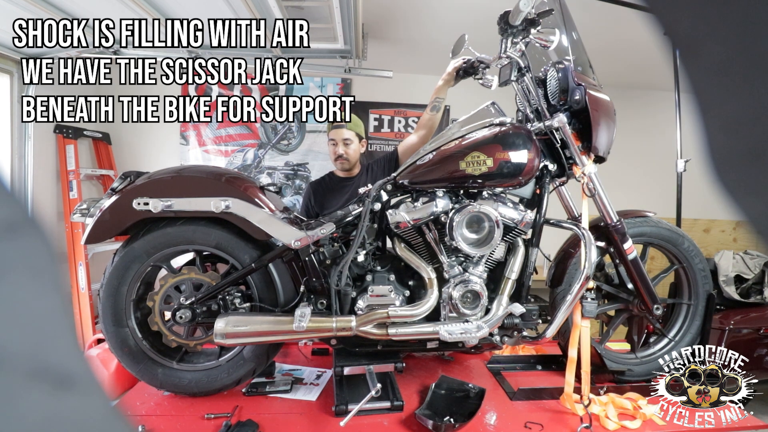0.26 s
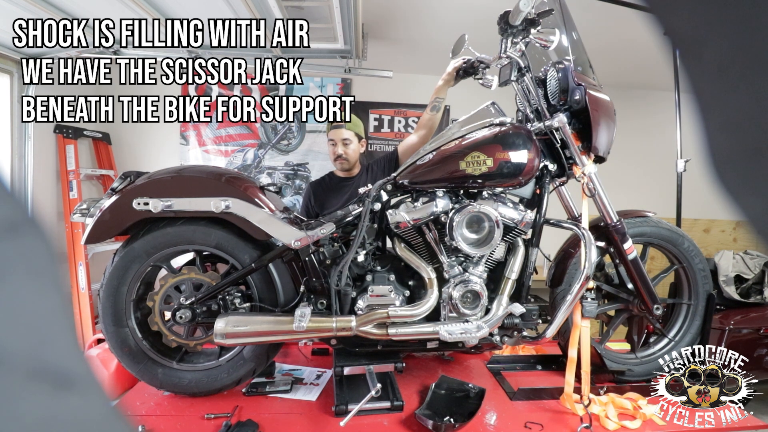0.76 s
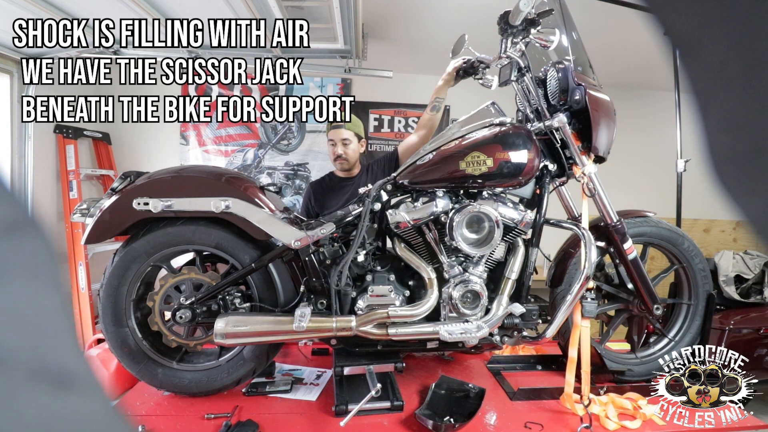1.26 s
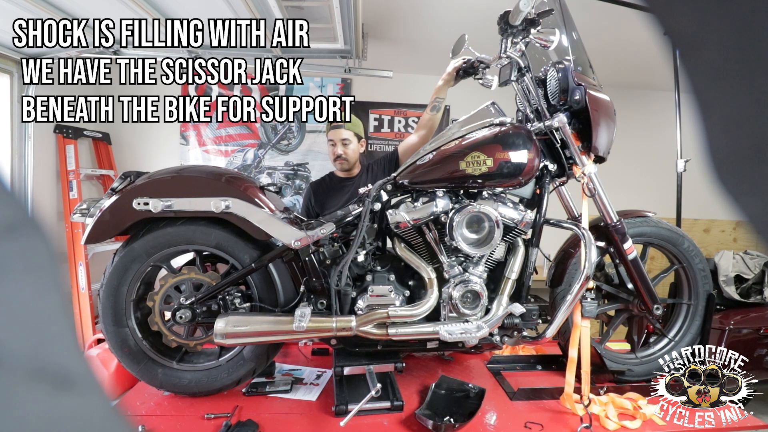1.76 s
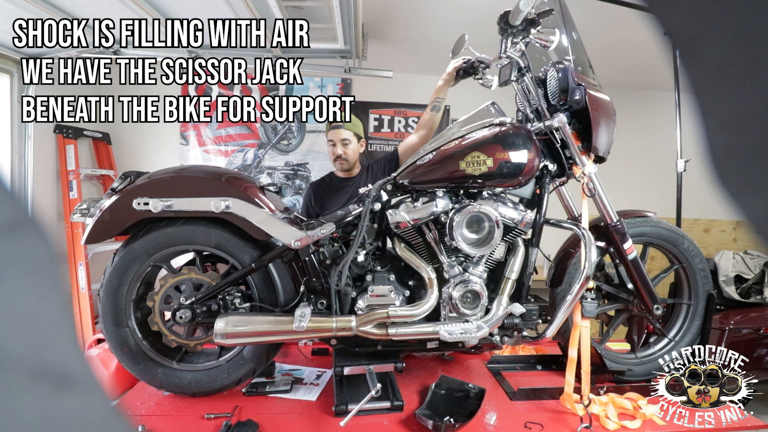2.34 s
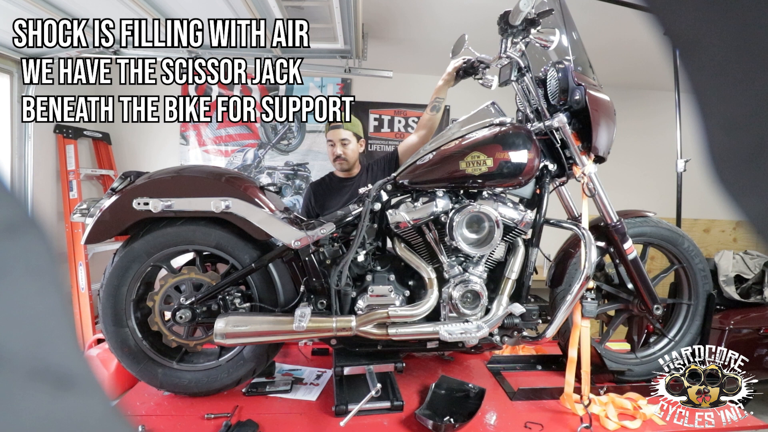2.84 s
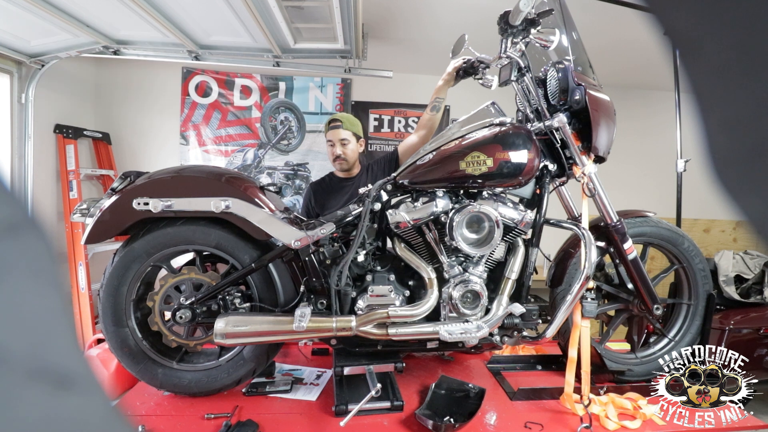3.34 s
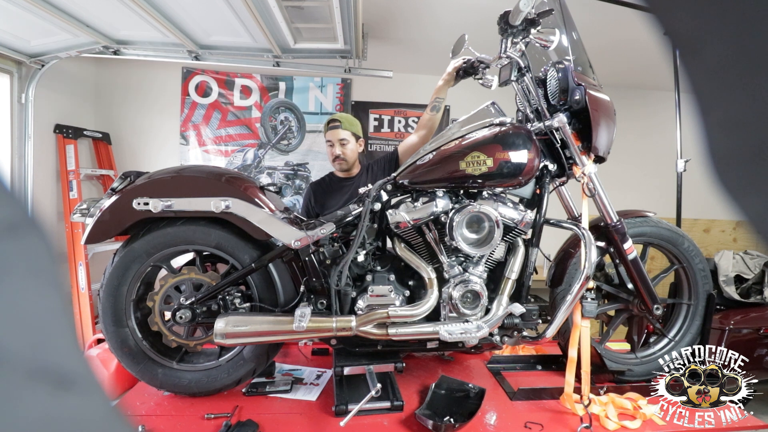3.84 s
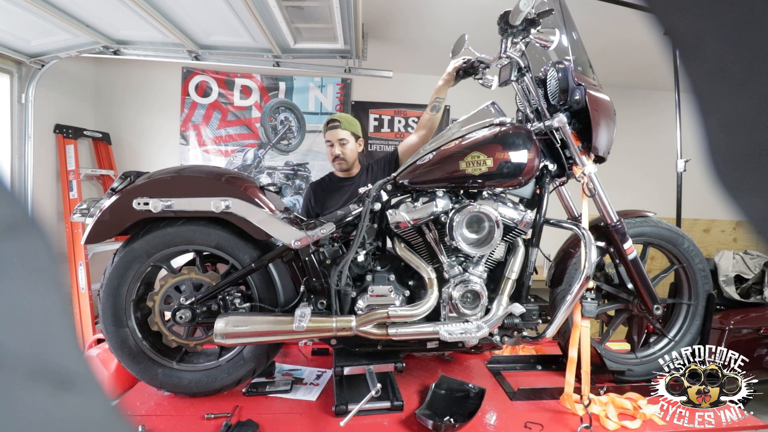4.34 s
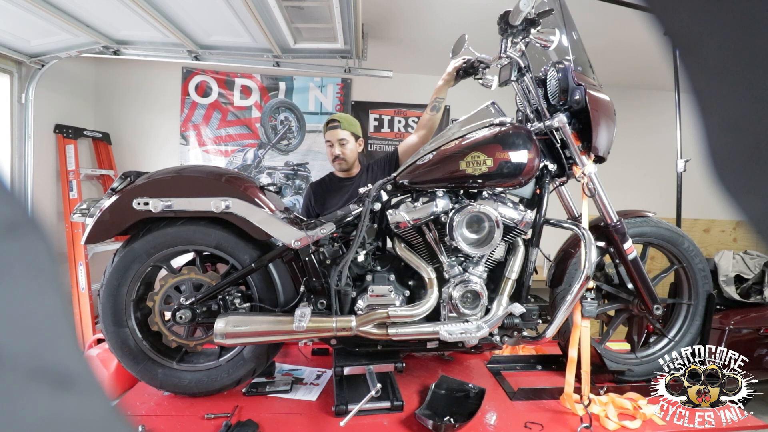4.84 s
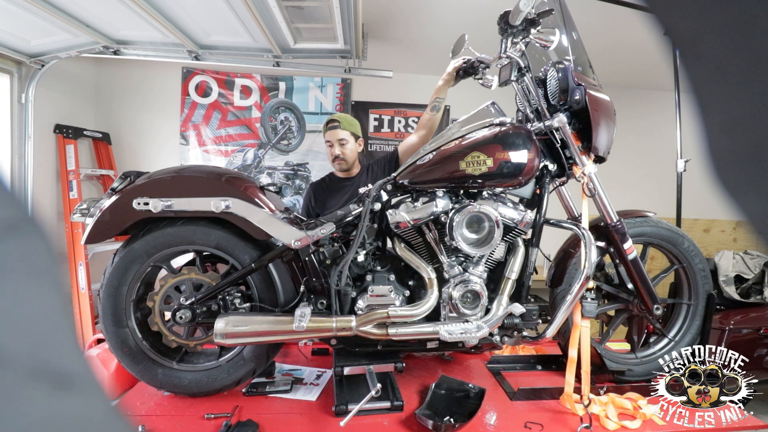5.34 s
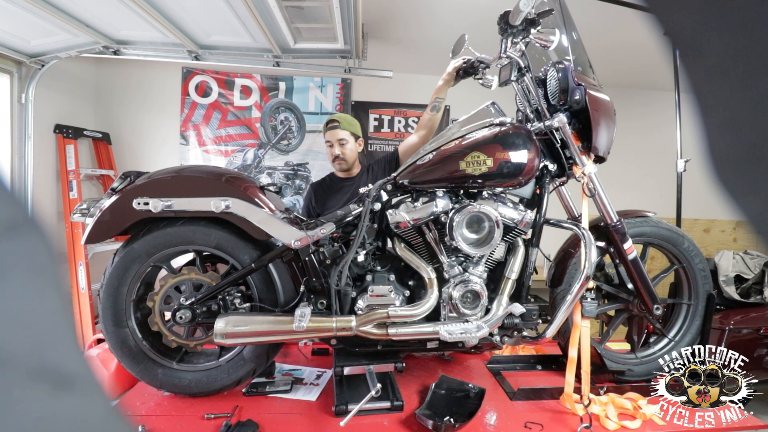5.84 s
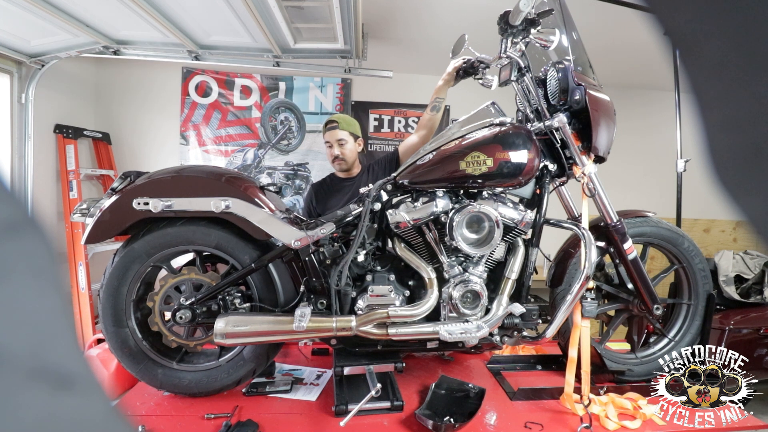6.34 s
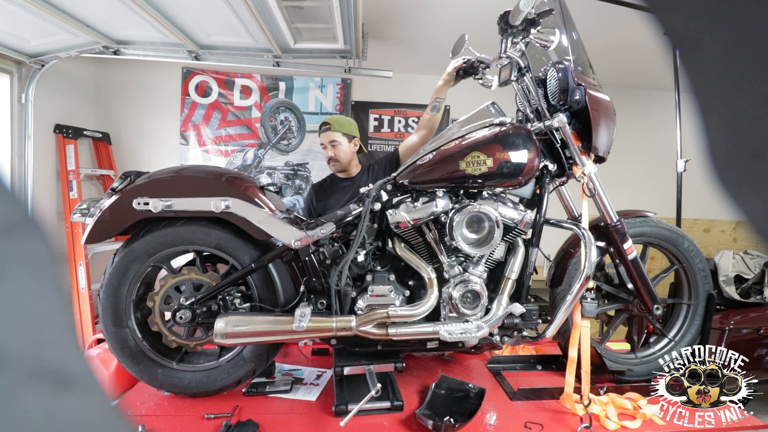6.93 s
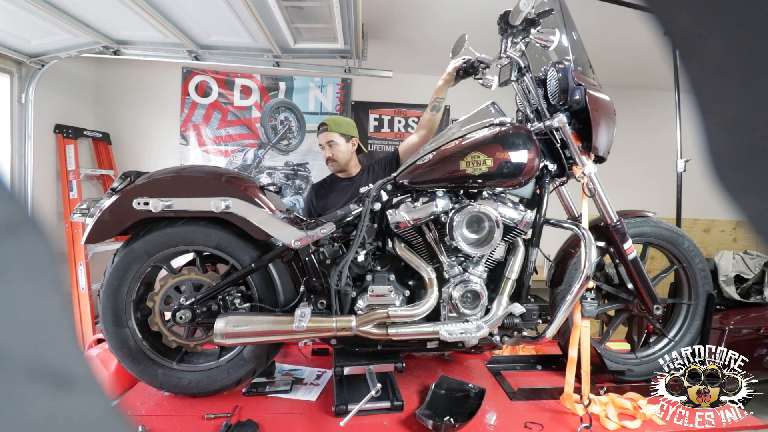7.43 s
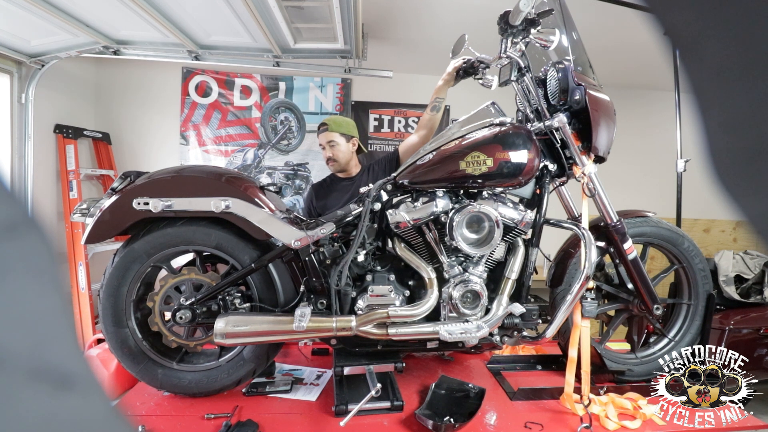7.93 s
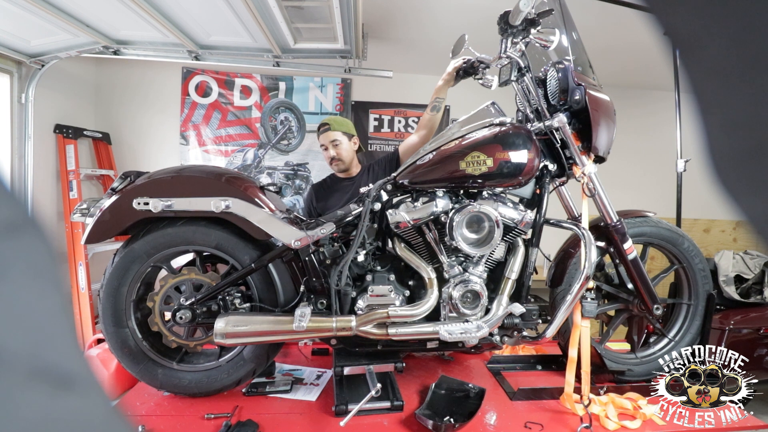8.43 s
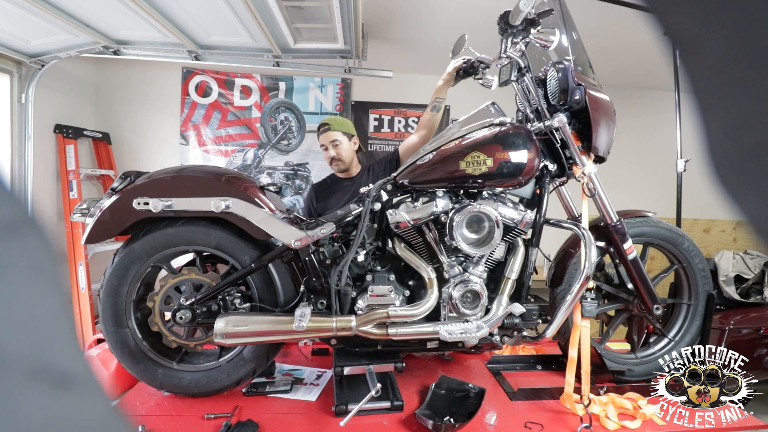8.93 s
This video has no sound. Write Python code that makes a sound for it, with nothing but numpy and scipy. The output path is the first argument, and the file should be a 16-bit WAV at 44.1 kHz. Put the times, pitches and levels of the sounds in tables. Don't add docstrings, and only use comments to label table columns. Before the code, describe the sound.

A small piston compressor is already running in a garage, a harsh, fast metallic clatter fused into a buzzing drone. Its pitch sinks slightly, quickest in the first second, as air hiss fades. A dull thud bounces early, a bright metal tick comes before the middle, and a loose panel buzzes in spells. Fairly close microphone, short room reverberation, no silence.

```python
import sys
import numpy as np
from scipy import signal
from scipy.fft import rfft, irfft, next_fast_len
from scipy.io import wavfile
from scipy.ndimage import uniform_filter1d

SR = 44100
rng = np.random.default_rng(int(sys.argv[2]) if len(sys.argv) > 2 else 0)


def boost_factor(decibels):
    exponent = np.asarray(decibels, float) / 20
    return 10 ** exponent


def persist_wave(psi):
    counts = np.round(np.clip(psi, -1, 1) * 32767).astype(np.int16)
    wavfile.write(sys.argv[1], SR, np.atleast_2d(counts).T)


N = 404397
TIME = np.arange(N) / SR
CAGE = .421

# crank angle in turns, level in dB.
STROKE_KNOCKS = [(.82, -5.5), (.87, -2), (0.932, -5.5), (.99, -1.5), (.05, -2.5), (.1, -1.5), (.18, -1),
                 (.26, -2), (0.358, -6.5), (0.477, -5), (.6, -3.5), (0.697, -2.5)]


def unit(x):
    return x / np.sqrt(np.mean(x ** 2))


def colour(x, table):
    size = next_fast_len(len(x))
    hz, db = np.transpose(table)
    f = np.maximum(np.arange(size // 2 + 1) * SR / size, 1)
    gain = boost_factor(np.interp(np.log(f), np.log(hz), db, -90, -90))
    return irfft(rfft(x, size) * gain, size)[:len(x)]


def ring(x, hz, width):
    return signal.lfilter(*signal.iirpeak(hz, hz / width, SR), x)


def walk(rate):
    k = int(SR / rate)
    held = np.repeat(rng.standard_normal(N // k + 1), k)
    return 1.53 * uniform_filter1d(uniform_filter1d(held, k), k)[:N]


def swell(start, length):
    rise_s = 0.36
    return np.clip(np.minimum(TIME - start, start + length - TIME) / rise_s + .5, 0, 1)


def blows(turns, slack, table, sway, jitter, scatter_db):
    angle, db = np.transpose(table)
    count = int(turns[-1])
    at = np.arange(count)[:, None] + angle
    chance = rng.standard_normal((count, 2, len(angle)))
    loose = np.interp(at, turns, slack)
    lean = rng.uniform(0, 2 * np.pi, len(angle))
    at = at + loose * (sway * np.cos(2 * np.pi * CAGE * at + lean) + jitter * chance[:, 0])
    size = rng.choice([-1, 1], len(angle)) * boost_factor(db + scatter_db * chance[:, 1])
    out = np.zeros(N)
    np.add.at(out, np.interp(at, turns, np.arange(N)).astype(int), size)
    return unit(out)


def hiss(turns, spread_db, start, rise, fall, floor):
    angle = (turns - start) % 1
    effort = floor + (1 - np.exp(-angle / rise)) * np.exp(-angle / fall)
    grit = boost_factor(spread_db * np.minimum(rng.exponential(size=N), 5))
    return unit(effort * rng.standard_normal(N) * grit)


def beat(turns, slack, depth_db):
    cage = np.cos(2 * np.pi * CAGE * turns) + 0.09 * np.cos(2 * np.pi * (1 - CAGE) * turns)
    return boost_factor(depth_db * slack * cage)


def housing(turns, slack, treble_db):
    # frequency in Hz, level in dB per Hz.
    cast_spectrum = [(800, -13), (1250, -10.5), (1480, -1), (1900, -1.5), (2400, -5.5), (2600, -8.5),
                     (3050, -6), (3400, -4), (3900, -9.5), (4400, -10), (7200, -22), (10500, -28.5),
                     (13300, -37.5), (16500, -43)]
    # frequency in Hz, width in Hz, level in dB above the body.
    cast_modes = [(1610, 36, -5), (1778, 82, -3.5), (2114, 8.2, 12), (2323, 18, 9), (2424, 21, 8),
                  (2703, 280, -7.5), (3240, 36, 3.5), (3424, 260, -1.5), (4192, 73, 2.5), (5300, 114, -1.5),
                  (5554, 84, 0), (6620, 173, 4), (8084, 100, 10.5), (8920, 150, -0.5), (10040, 230, 2),
                  (12050, 220, 6.5), (12700, 74, -2)]
    drive = blows(turns, slack, STROKE_KNOCKS, .015, .008, .8)
    drive = drive + boost_factor(-4) * hiss(turns, 1.2, .82, .06, .3, .16)
    body = colour(drive * beat(turns, slack, 0.51), cast_spectrum)
    whole = body + sum(boost_factor(db + .5 * walk(.5)) * ring(body, hz, w) for hz, w, db in cast_modes)
    whole = whole - .85 * ring(whole, 3735, 240)
    treble = colour(whole, [(6000, -30), (10000, 0), (17000, 0)])
    middle = np.std(colour(whole, [(1500, 0), (2600, 0)]))
    panel_ring = boost_factor(-15) * unit(ring(body, 1447, 20))
    return (whole + (boost_factor(treble_db) - 1) * treble) / middle + panel_ring


def frame(turns, slack):
    # frequency in Hz, level in dB per Hz.
    frame_spectrum = [(20, -24), (50, -16), (100, -6), (150, -9.5), (400, -10), (520, 0), (800, -8.5),
                      (930, -4), (1100, -6.5), (1300, -1), (1600, -30)]
    knock = blows(turns, slack, STROKE_KNOCKS, .025, .009, .8)
    knock = colour(knock, [(400, -30), (700, 0), (3000, 0)])
    drive = 2 * knock + hiss(turns, 2.5, 1.0, 0.17, 0.82, 0.89)
    body = colour(drive * beat(turns, slack, 0.29), frame_spectrum)
    return unit(body + boost_factor(1) * ring(body, 1020, 157))


def reed(turns, slack):
    # crank angle in turns, level in dB.
    reed_slaps = [
        (.94, 0),
        (.995, -13),
    ]
    # frequency in Hz, width in Hz, level in dB.
    reed_modes = [(3665, 58, 0), (3795, 55, -1)]
    drive = blows(turns, slack, reed_slaps, .006, .0025, .7)
    drive = drive + boost_factor(-21) * hiss(turns, 1.5, .95, .1, .1, .05)
    drive = drive * beat(turns, slack, .9)
    pair = sum((-1) ** k * boost_factor(db) * ring(drive, hz, w) for k, (hz, w, db) in enumerate(reed_modes))
    return unit(ring(pair, 3730, 270))


def head(turns, slack):
    head_hz, width_hz = 1650, 350
    drive = blows(turns, slack, [(.97, 0)], .012, .008, 1.2) * beat(turns, slack, 1)
    return unit(ring(ring(drive, head_hz, width_hz), head_hz, 2 * width_hz))


def cover(cast):
    return boost_factor(-24.5) * np.exp(-TIME / 0.36) * unit(ring(cast, 2305, 250))


def thump(turns, speed_hz, slack, settled):
    # multiple of the shaft, level in dB, change in dB once the loose part settles.
    shaft_tones = [(1, -47.5, -1), (2, -35.5, -4), (3, -55, 0), (4, -38, -2), (5, -40, 2), (6, -40.5, -10),
                   (7, -40.5, -11), (8, -47.5, -22), (9, -31.5, -2), (10, -52.5, 0), (11, -52, 10.5),
                   (12, -51, 6), (13, -37.5, -0.5), (14, -41, 5), (15, -29, -15), (16, -43.5, 8),
                   (17, -44, 2), (18, -45.5, 3)]
    # frequency in Hz, width in Hz, lift in dB.
    path_lifts = [(126.7, 1.6, -9), (194.3, 3.5, 10), (256.3, 1.6, -22), (325, 2, 4), (333.3, 2, -10),
                  (385, 1.3, -11), (453, 1.7, -13), (527, 4, 9), (577.5, 3.8, -13), (650, 11, 15),
                  (696, 4, 11), (772, 17, 14), (856, 10, -18), (910, 8, 15), (950, 12, -14), (1038, 5, 15)]
    coarse = slice(None, None, 256)
    out = np.zeros(N)
    for k, db, settled_db in shaft_tones:
        path_db = sum(lift / (1 + ((k * speed_hz[coarse] - hz) / w) ** 2) for hz, w, lift in path_lifts)
        path_db = np.interp(TIME, TIME[coarse], path_db)
        gain = boost_factor(db + path_db + settled_db * settled + 0.44 * walk(2.63))
        phase = rng.uniform(0, 2 * np.pi, 2)
        tone = np.sin(2 * np.pi * k * turns + phase[0])
        side = slack * boost_factor(-11 + 2 * walk(.8)) * np.sin(2 * np.pi * (k - CAGE) * turns + phase[1])
        out = out + gain * (tone + side * (k > 2))
    return out


def sing(turns, seating):
    return boost_factor(-25.5) * seating * np.sin(2 * np.pi * 34 * turns)


def rush():
    # frequency in Hz, level in dB per Hz.
    air_spectrum = [(7000, -20), (9000, 0), (13000, -3), (15500, -12)]
    return boost_factor(-45) * np.exp(-TIME / .6) * unit(colour(rng.standard_normal(N), air_spectrum))


def engine():
    # time in seconds, pitch in Hz, level in dB.
    engine_revs = [(0, 80, -52), (1.85, 79, -50), (2.3, 78, -53), (3.3, 85, -54), (3.45, 94, -46),
                   (3.8, 99, -47), (4.12, 117, -51), (4.8, 103, -47), (5.5, 99, -54), (7.1, 99, -60),
                   (9.17, 80, -57)]
    s, hz, db = np.transpose(engine_revs)
    turns = np.cumsum(np.interp(TIME, s, hz) * (1 + 0.0078 * walk(14))) / SR
    return np.sqrt(2) * boost_factor(np.interp(TIME, s, db) + 2 * walk(6)) * np.sin(2 * np.pi * turns)


def panel():
    # start in seconds, length in seconds, level in dB.
    buzz_spells = [
        (0.307, 0.41, -30),
        (.85, 0.63, -29.5),
        (2.0, 0.45, -38),
        (3.0, 0.61, -29.5),
        (3.702, 0.79, -33),
        (8.003, .2, -39.5),
        (8.853, .4, -31),
    ]
    buzz = boost_factor(-49.5) + sum(boost_factor(db) * swell(s, length) for s, length, db in buzz_spells)
    turns = np.cumsum(1447 + 3 * walk(25)) / SR
    return buzz * np.sqrt(2) * boost_factor(1.5 * walk(30)) * np.sin(2 * np.pi * turns)


def thud():
    # time in seconds, level in dB.
    thud_hits = [
        (0.419, -28.5),
        (0.447, -31),
        (0.561, -37),
    ]
    # frequency in Hz, width in Hz, level in dB.
    thud_modes = [(221, 23, -2), (278, 19, 5.5), (302, 36, -8)]
    hits = np.zeros(N)
    for s, db in thud_hits:
        hits[int(s * SR)] = boost_factor(db + 50)
    return sum(boost_factor(db) * ring(hits, hz, w) for hz, w, db in thud_modes)


def tick():
    # frequency in Hz, level in dB.
    tick_spectrum = [(2000, -20), (4500, 0), (8000, 2), (11000, 2), (13000, -16), (16000, -25)]
    start_s, level_db = 3.696, -14
    burst = np.zeros(N)
    age = np.arange(8000) / SR
    fade = .7 * np.exp(-age / .006) + .45 * np.exp(-age / .035)
    fade = (1 - np.exp(-age / .0008)) * fade
    burst[int(start_s * SR):][:len(age)] = boost_factor(level_db) * rng.standard_normal(len(age)) * fade
    return colour(burst, tick_spectrum)


def garage(x):
    t60_s, tail_db = .55, -8
    age = np.arange(int(.6 * SR)) / SR
    tail = rng.standard_normal((2, len(age))) * np.exp(-np.log(1000) * age / t60_s) * (age > .004)
    tail = tail[0] * np.exp(-age / 0.1) + .5 * signal.lfilter([.3], [1, -.7], tail[1])
    tail *= boost_factor(tail_db) / np.sqrt(np.sum(tail ** 2))
    return (x + signal.fftconvolve(x, tail)[:N]) / np.sqrt(1 + boost_factor(tail_db) ** 2)


def scene():
    # time in seconds, shaft speed in turns per second.
    shaft_speed = [(0.0, 67.63), (0.5, 66.46), (1.0, 65.91), (1.6, 65.18), (2.3, 64.94), (3.0, 64.53),
                   (3.8, 64.48), (4.6, 64.24), (5.4, 64.01), (6.2, 63.78), (7.0, 63.42), (7.8, 63.2),
                   (8.4, 63.12), (9.17, 62.76)]
    speed_hz = np.interp(TIME, *np.transpose(shaft_speed))
    turns = .135 + np.cumsum(speed_hz) / SR
    load = (speed_hz[0] - speed_hz) / (speed_hz[0] - speed_hz[-1])

    settled = np.clip((TIME - 8.4) * 3 + .5, 0, 1)
    slack = (1 - (1 - .7) * np.exp(-TIME / 1.2)) * (1 - (1 - .4) * settled)
    seating = swell(8.3, .5)
    empty = np.exp(-TIME / 0.36)
    effort = boost_factor(0.5 * empty + 0.5 * seating)
    surge = swell(1.78, 1.4)

    cast = housing(turns, slack, 1.5 - 3 * load + 1.5 * np.exp(-TIME / 0.37))
    noisy = cast * boost_factor(-23.5 + surge)
    noisy = noisy + frame(turns, slack) * boost_factor(-26 - 6.5 * load + 3 * empty + 2 * surge)
    noisy = noisy * effort + cover(cast)
    valve = reed(turns, slack) * boost_factor(-28 + 6.5 * load)
    room_share = .6
    noisy = noisy + room_share * valve
    noisy = noisy + head(turns, slack) * boost_factor(-36.5 + 2.5 * load)

    direct = thump(turns, speed_hz, slack, settled) + sing(turns, seating) + (1 - room_share) * valve
    return (garage(noisy + thud() + tick()) + direct + rush() + engine() + panel())[None]


def low_pass(x):
    return signal.sosfilt(signal.butter(12, 15740, fs=SR, output="sos"), x)


def record(dry):
    dry = signal.sosfilt(signal.butter(3, 52, "high", fs=SR, output="sos"), dry)
    dry = np.tanh(1.3 * dry) / 1.25
    dry = signal.sosfilt(signal.ellip(10, .2, 70, 15740, fs=SR, output="sos"), dry)
    return low_pass(dry)


dry = scene()
out = record(dry)
persist_wave(out)
```